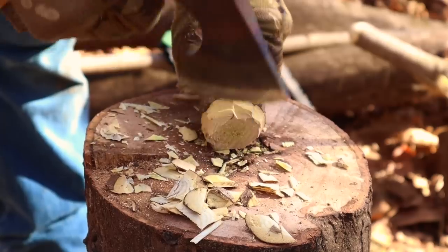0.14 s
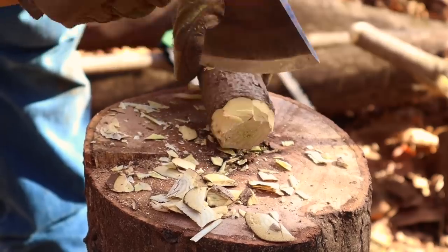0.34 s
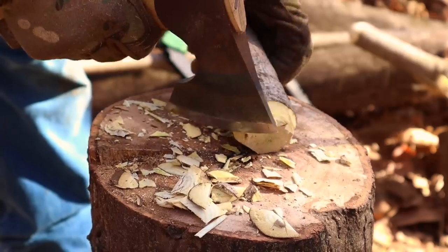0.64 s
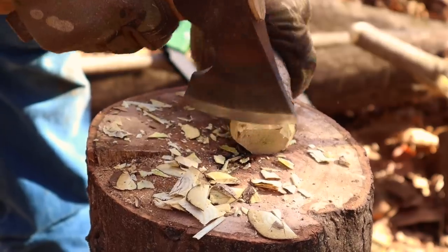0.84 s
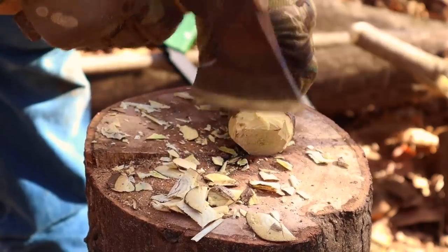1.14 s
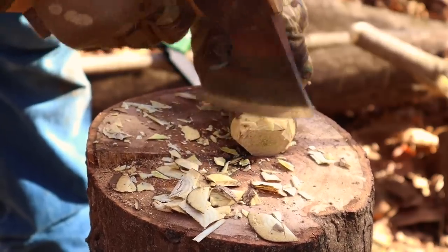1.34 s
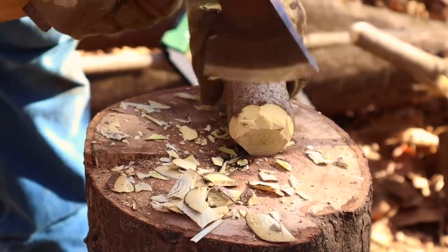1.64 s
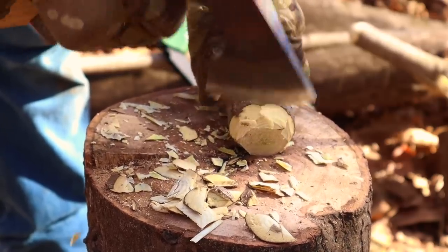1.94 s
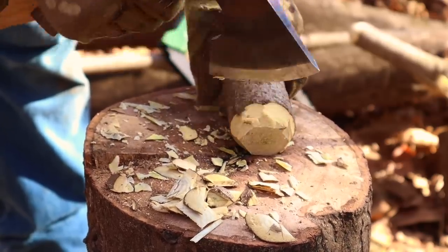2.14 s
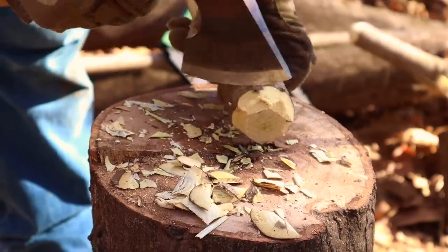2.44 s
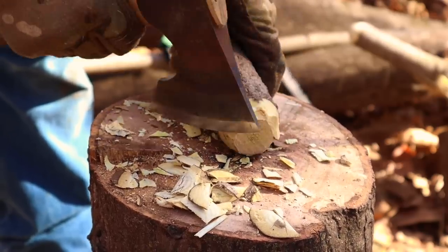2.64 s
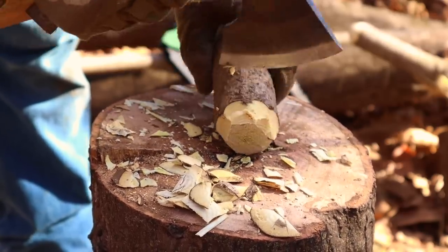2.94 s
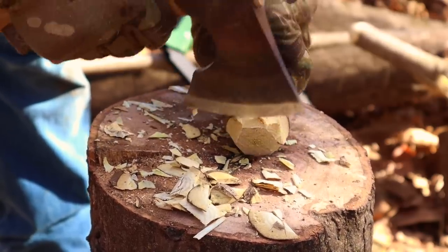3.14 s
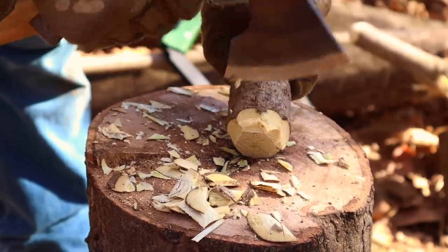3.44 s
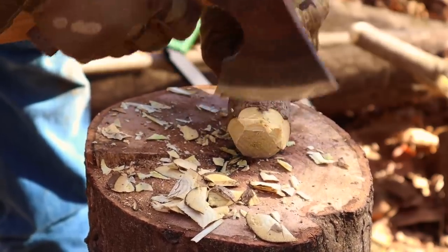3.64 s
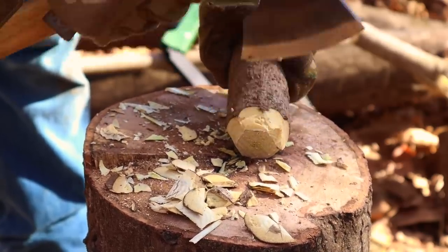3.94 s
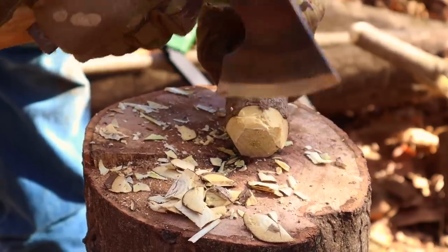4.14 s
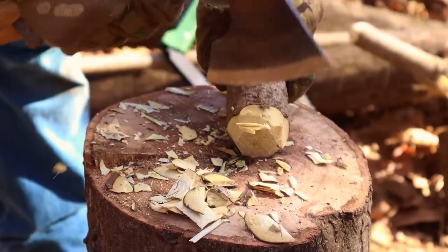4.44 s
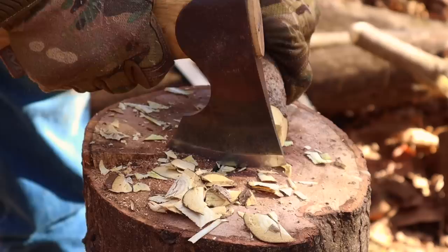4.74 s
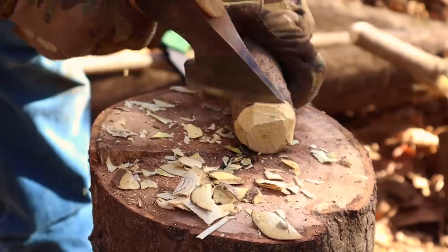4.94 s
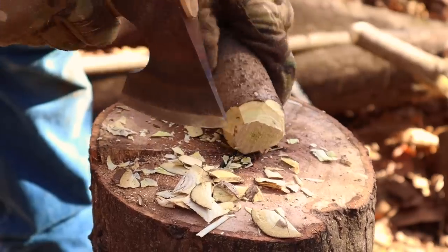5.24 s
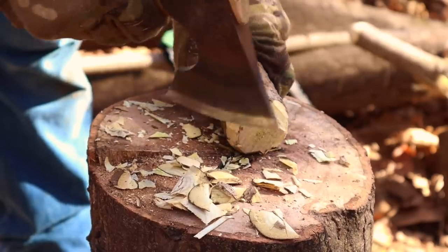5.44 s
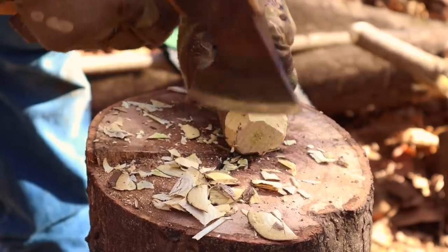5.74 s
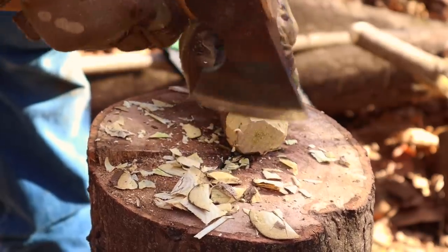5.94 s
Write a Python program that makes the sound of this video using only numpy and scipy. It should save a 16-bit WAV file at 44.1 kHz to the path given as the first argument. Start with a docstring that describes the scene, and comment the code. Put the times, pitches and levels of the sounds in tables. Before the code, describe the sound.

A hatchet chops a small green stick on a stump in three quick runs of crisp woody cracks, outdoors in quiet woods, heard close.

```python
"""Quiet woods, where a hatchet sharpens a green stick on a stump close by.
Each chop is two contacts (bite and snap) and a crackle of torn fibres, filtered by the stick's resonances.
The steel rings as fading sine waves; landings on the stump are duller blows; pulling free makes singing ticks.
Chips tick down, glove, sleeve and bark rub as shaped noise, and the grip squeaks once.
The trees answer faintly through an echo pattern, over soft air noise and a thin high whine."""
import sys
import numpy as np
from scipy import signal
from scipy.fft import rfft, irfft, next_fast_len
from scipy.io import wavfile
from scipy.ndimage import map_coordinates

SR = 44100
rng = np.random.default_rng(int(sys.argv[2]) if len(sys.argv) > 2 else 0)


def master(y):
    """Save y as 16-bit WAV."""
    cut = np.clip(np.atleast_2d(y).T, -1, 1)
    pcm = np.round(cut * 32767)  # scale
    wavfile.write(sys.argv[1], SR, pcm.astype(np.int16))


N = 268128  # length of the scene in samples
T = np.arange(SR // 4) / SR  # clock of one short sound, in seconds
TOP_HZ = 15800  # upper limit of the sound

# chops: t/s, level/dB, bite-to-snap/s, tearing/s, first stick mode f/Hz, second mode f/Hz,
# second mode gain/dB, boom/dB, knock/dB, brightness/dB
CHOPS = [ (0.0008, -24.5, .004, .009, 880, 2450, 4, -4, 0, 3.5),
         (0.2316, -28.5, .0028, .008, 1140, 3300, -4, -3, 1, 1),
         (1.0964, -32.3, .0014, .004, 830, 2700, 3, 7, 8, 1.5),
         (1.3384, -27.3, .0022, .005, 1080, 2860, 10, -2, -7, -3),
         (1.5594, -27.7, .0031, .010, 1340, 2860, 6, 0, -4, 0),
         (1.7961, -26.3, .0008, .008, 1000, 2600, -1, -3, -2, -3),
         (2.0344, -27.8, .0008, .009, 880, 2900, 3, -7, -1, .5),
         (2.2672, -31.5, .002, .006, 920, 3050, 2, 6, 3, 7),
         (3.3986, -24.5, .0041, .007, 980, 3020, 4, -1, -3, -2),
         (3.6209, -24.5, .0021, .006, 1720, 3200, -1, 10, 3, .5),
         (3.8577, -16.8, .0013, .005, 1170, 3100, 7, 4, -8, 0),
         (4.0984, -19.8, .0044, .006, 1180, 2850, -1, -1.5, -1, -2),
         (4.3748, -11.2, .0028, .005, 1480, 2700, 0, -7, -2, -1.5),
         (4.7201, -16.8, .0029, .007, 1100, 2950, 8, -1, -9, -1.5),
         (5.0745, -38.8, .0045, .01, 1190, 3100, 1, 4, 2.5, 5),
         (5.6964, -35.3, .0009, .004, 700, 2720, 6, 5, 8, -7),
         (5.9268, -32.3, .005, .012, 900, 2850, 6, -5, 1, 2)]
# blade or stick landing on the stump: t/s, level/dB, time to take the weight/s, boom/dB, knock/dB, brightness/dB
LANDINGS = [ (0.027, -32.9, .002, -2, -3.5, -8), (1.1162, -32.5, .0035, 4, -4.5, -2),
            (1.5905, -44.5, .0035, 5, 0, 1.5), (1.8182, -32.5, .005, 2, -5.5, 1.5),
            (2.0578, -32.2, .003, -3, -5.5, 0), (2.606, -56, .001, 3.5, 5, 3),
            (4.7358, -21.5, .0015, -5, 6.5, 2), (5.088, -52, .015, -2, 0, 6),
            (5.233, -55.5, .002, -1, -2, 4), (5.7195, -38, .0022, 8, 8, 5)]
# the blade pulled free of the cut: t/s, level of the tick/dB
PULLS = [(2.362, -53), (3.456, -58), (3.931, -58.5), (4.181, -61), (4.451, -60)]
# larger chips ticking down: t/s, level/dB, brightness/dB (tick() adds 2 dB to it)
CHIPS = [(2.328, -50.5, -2), (4.7893, -43, -9), (4.922, -57, -13), (5.111, -54, -12), (5.18, -59, -12.5),
         (5.221, -50, -15), (5.238, -54, -21)]
# rubs of glove, sleeve and bark as the stick is turned: t of reaching full level/s, length/s, level/dB
RUBS = [(0.485, .03, -55), (0.558, .025, -59.5), (0.745, .09, -62.5), (0.868, .05, -64.5),
        (2.375, .13, -65.5), (2.442, .015, -57.5), (2.622, .11, -65), (2.767, .02, -56.5), (4.9, .16, -67),
        (5.085, .015, -52), (5.11, .05, -59), (5.225, .11, -58.5), (5.385, .04, -66), (5.62, .07, -70)]
# one tiny squeak of the grip: t/s, f/Hz, level/dB
SQUEAK = (0.686, 3200, -59)

# colour of the struck stick: f/Hz, level/dB
STICK_COLOUR = [(40, -38), (150, -35), (265, -9), (410, -12.5), (620, -2.5), (950, 0), (1250, 0),
                (1750, -4), (2200, -5.5), (3300, -5.5), (4700, -21.5), (5500, -18.5), (7400, -6.5),
                (9500, -21.5), (13000, -20.5), (15800, -28)]
# colour of the stump's broad knock: f/Hz, level/dB
STUMP_COLOUR = [(40, -38), (130, -19), (250, 3), (400, -4), (600, 2), (1100, 1), (1900, -11), (2900, -4),
                (4500, -17), (8000, -22), (16000, -34)]
# ringing modes of the stump: f/Hz, level/dB, time to fall 60 dB/s
STUMP_MODES = [(240, -1.5, .026), (305, -5, .027), (560, -4, .026), (1034, -2, .036)]
# ringing modes of the steel head: f/Hz, level/dB, time to fall 60 dB/s
BLADE_MODES = [(1179, -7, .033), (2778, -1, .026), (4716, -26, .026), (6945, -5, .048), (7040, -11, .04),
               (8210, -19, .024), (13300, -23, .036)]
# the grip of the wood damps the steel's lower modes most: f/Hz, level/dB
HELD_COLOUR = [(7000, -9), (13000, 0)]
# where a blow's colour is set, from boom through knock, middle and crack to brightness: f/Hz
TONE_HZ = [250, 620, 1300, 2900, 7000]
# colour of a falling chip: f/Hz, level/dB
CHIP_COLOUR = [(200, -20), (700, -6), (1500, -1), (4200, 0), (9000, 0), (16000, -10)]
# colour of rubbing: f/Hz, level/dB
RUB_COLOUR = [(200, -20), (700, -11), (1800, -1.5), (2900, 0), (4600, -9), (9000, -15), (16000, -28)]
# colour of the trees' far answer: f/Hz, level/dB
TREES_COLOUR = [(100, -15), (500, -7), (1000, -1), (1700, -.5), (3000, -4), (6000, -14.5), (16000, -21)]
# colour of the still air: f/Hz, level/dB
AIR_COLOUR = [(15, -40), (25, -7.5), (44, -8), (70, -3), (114, -3), (277, -5), (575, -3), (863, -6.5),
              (1130, -6.5), (1700, -8.5), (2410, -7.5), (6050, -14), (6920, -12.5), (16000, -21)]
# thin steady whine: f/Hz, rms level/dB
WHINE = [(6697, -83), (13388, -95)]

# the sooner the chip gives, the harder it snaps: snap over bite with no wait (dB), fall with the wait (dB per s)
SNAP_DB, SNAP_FALL_DB_PER_S = 14, 3000
# longer tearing is also stronger: its level at zero length (dB), growth with length (dB per s)
TEAR_DB, TEAR_GROWTH_DB_PER_S = -10.5, 1300
# the stick's modes: gain of the first over the direct blow (dB), sharpness Q of both
FIRST_MODE_DB, FIRST_Q, SECOND_Q = 1, 6, 8
# a landing sooner than this after a chop means the blade sliced clean through
THROUGH_S = .05
# ring of the steel: after slicing through (dB relative to the chop), held in the wood (dB, whatever the chop)
FREE_RING_DB, HELD_RING_DB = -.5, -40
# share of a blow's brightness that also reaches its crack, near 3 kHz
CRACK_SHARE = .4
# the pull's tick: brightness before tick() adds 2 dB (dB), singing steel relative to the tick (dB)
PULL_BRIGHT_DB, PULL_RING_DB = -6, -4.5
# crumbs: chance per chop, shortest and longest flight (s), level (dB), brightness before tick() adds 2 dB (dB)
CRUMB_CHANCE, CRUMB_SOON_S, CRUMB_LATE_S, CRUMB_DB, CRUMB_BRIGHT_DB = .35, .04, .13, -64, -12
# each rub: rise, time to fall 60 dB (s); the fainter sleeve after it: relative level (dB), time to fall 60 dB (s)
RUB_RISE_S, RUB_RELEASE_S, SLEEVE_DB, SLEEVE_T60_S = .015, .07, -14, .8


def chops():
    """The edge bites, fibres tear and a chip snaps off; the cut drives the steel and the blow shakes the ground."""
    out = np.zeros(N)
    for s, db, gap, tear, first_hz, second_hz, second_db, *shade in CHOPS:
        snap_db = SNAP_DB - SNAP_FALL_DB_PER_S * gap
        tear_db = TEAR_DB + TEAR_GROWTH_DB_PER_S * tear
        contacts = push(0, width=.00002) + amp(snap_db) * push(gap, width=.000012)
        tearing = crackle(fade(t60=.016, hold=.85 * tear), spread=.6)
        force = contacts / np.hypot(1, amp(snap_db)) + amp(tear_db) * tearing
        # the stick's modes shift with the grip and with where the edge lands
        first_mode = amp(FIRST_MODE_DB) * resonate(force, first_hz, FIRST_Q)
        second_mode = amp(second_db) * resonate(force, second_hz, SECOND_Q)
        wood = force + first_mode + second_mode
        add(out, s, amp(db) * burst(colour(wood, STICK_COLOUR, tone(*shade))))

        # the steel starts to die away faster at the next landing
        free = min([row[0] - s for row in LANDINGS if row[0] > s], default=1)
        steel = ring(BLADE_MODES, hold=.6 * tear, attack=.001, scatter_db=1)
        steel = steel * fade(t60=.05, hold=free)
        if free < THROUGH_S:
            steel_ring = amp(db + FREE_RING_DB) * steel
        else:
            steel_ring = amp(HELD_RING_DB) * colour(steel, HELD_COLOUR)
        add(out, s + gap / 2, steel_ring)

        stump = ring(STUMP_MODES, hold=0, attack=.002, scatter_db=2.5)
        add(out, s + gap, amp(db - 27) * burst(stump))
        ground = ring([(66, 0, .35), (95, -9, .16)], hold=0, attack=.012, scatter_db=0.5)
        add(out, s, amp(.4 * db - 54.5) * ground)  # harder chops shake it only a little more
    return out


def landings():
    """A duller blow into the heavy stump: chips crush first, then the block takes the weight."""
    out = np.zeros(N)
    for s, db, seat, *shade in LANDINGS:
        crushing = crackle(fade(t60=.02, hold=1.3 * seat), spread=.5)
        force = 1.5 * push(seat, width=.00016) + crushing
        knock = burst(colour(force, STUMP_COLOUR))
        stump = ring(STUMP_MODES, hold=0, attack=.001, scatter_db=1.0)
        add(knock, seat, amp(-5) * burst(stump))
        add(out, s, amp(db) * burst(colour(knock, tone(*shade))))
    return out


def pulls():
    """The edge leaves the cut with a tick that sets its high mode singing."""
    out = np.zeros(N)
    for s, db in PULLS:
        singing = ring([(6990, 0, .16)], hold=0, attack=.001, scatter_db=0)
        add(out, s, amp(db) * (tick(PULL_BRIGHT_DB) + amp(PULL_RING_DB) * singing))
    return out


def chips():
    """Chips tick down on the stump as short crackles; now and then a crumb follows a chop."""
    out = np.zeros(N)
    for s, db, bright_db in CHIPS:
        add(out, s, amp(db) * tick(bright_db))
    for (s, *_), (luck, flight) in zip(CHOPS, rng.random((len(CHOPS), 2))):
        fall = CRUMB_SOON_S + flight * (CRUMB_LATE_S - CRUMB_SOON_S)
        crumb = amp(CRUMB_DB) * tick(CRUMB_BRIGHT_DB)
        add(out, s + fall, (luck < CRUMB_CHANCE) * crumb)
    return out


def handling():
    """Cloth and bark rub in uneven strokes, catching and slipping; once the grip squeaks."""
    t = np.arange(N) / SR
    effort = np.sqrt(sum((amp(db) * stroke(t - s, length)) ** 2 for s, length, db in RUBS))
    catches = amp(1.2 * wobble(60) + 2.5 * wobble(500))
    friction = catches * crackle(np.ones(N), spread=.9)
    rub = effort * unit(colour(friction, RUB_COLOUR))
    s, hz, db = SQUEAK
    swell = np.exp(-((t - s) / .006) ** 2)
    squeak = swell * np.sin(2 * np.pi * np.cumsum(hz + 90 * wobble(400)) / SR)
    return rub + amp(db) * squeak


def trees(x):
    """The log pile scatters a short bright answer, the woods a thin dull tail, and one trunk throws back an echo."""
    logs = crackle(fade(t60=.09) * (1 - np.exp(-T / .01)), spread=.3)
    tail = crackle(fade(t60=.42) * (1 - np.exp(-T / .006)), spread=.45)
    trunk = amp(-38) * click(.0543)
    near = colour(amp(-32.8) * logs, [(100, -8), (1200, 0), (3000, -3), (7000, -2), (16000, 0)])
    far = colour(amp(-36) * tail + trunk, TREES_COLOUR)
    return signal.fftconvolve(x, near + far)[:N]


def background():
    """Still forest air is gently wavering noise; the whine is sine waves whose pitch trembles slightly."""
    air = amp(-66.5 + .5 * wobble(3)) * unit(colour(rng.standard_normal(N), AIR_COLOUR))
    whine = np.zeros(N)
    for hz, db in WHINE:
        phase = 2 * np.pi * np.cumsum(hz + 22 * wobble(120)) / SR
        whine += amp(db) * np.sqrt(2) * np.sin(phase)  # root 2 turns rms into peak
    return air + whine


def push(s, width):
    """A contact s seconds into a sound, softened over width seconds by yielding wood."""
    since = np.maximum(T - s, 0)
    pulse = since * np.exp(-since / width)
    return pulse / (pulse.sum() + 1e-20)


def crackle(envelope, spread):
    """Fibres breaking: noise whose grains vary widely in size (log-normal), total energy 1."""
    size = np.exp(spread * np.clip(rng.standard_normal(len(envelope)), -2, 2))
    x = envelope * size * rng.standard_normal(len(envelope))
    return x / np.linalg.norm(x)


def resonate(x, hz, q):
    """A damped resonance of gain 1 at its centre; a higher q rings longer."""
    return signal.lfilter(*signal.iirpeak(hz, q, SR), x)


def ring(modes, hold, attack, scatter_db):
    """Damped modes, each sounded at a slightly random strength and a random phase."""
    waves = np.zeros(len(T))
    for hz, db, t60 in modes:
        strength = amp(db + rng.normal(0, scatter_db))
        waves += strength * fade(t60, hold) * np.sin(2 * np.pi * (hz * T + rng.random()))
    return waves * (1 - np.exp(-T / attack))


def tick(bright_db):
    """A light dry tick of wood: a very short crackle, its treble set by bright_db plus 2 dB."""
    grains = crackle(fade(t60=.012, hold=.002), spread=.8)
    return burst(colour(grains, CHIP_COLOUR, [(2500, 0), (7000, bright_db + 2)]))


def stroke(t, length):
    """Level of one rub: rise until t = 0, hold for length, then release into a faint stir of the sleeve."""
    rise = np.clip(1 + t / RUB_RISE_S, 0, 1)
    after = np.maximum(t - length, 0)
    release = amp(-60 * after / RUB_RELEASE_S)
    sleeve = amp(SLEEVE_DB - 60 * after / SLEEVE_T60_S)
    return rise * np.maximum(release, sleeve)


def tone(boom_db, knock_db, bright_db):
    """A blow's own colour, relative to the middle of the wood's range."""
    return list(zip(TONE_HZ, [boom_db, knock_db, 0, CRACK_SHARE * bright_db, bright_db]))


def colour(x, *spectra):
    """Filter without pre-echo (minimum phase) whose gain in dB is the sum of the (Hz, dB) spectra."""
    size = 2 * next_fast_len(len(x))
    log_hz = np.log(np.fft.rfftfreq(size, 1 / SR) + 1)
    db = sum(np.interp(log_hz, np.log([p[0] for p in s]), [p[1] for p in s]) for s in spectra)
    # folding the cepstrum (spectrum of the log gain) puts the response after time zero
    cepstrum = irfft(np.log(amp(db)))[:size // 2]
    cepstrum[1:] *= 2
    return irfft(rfft(x, size) * np.exp(rfft(cepstrum, size)))[:len(x)]


def fade(t60, hold=0):
    """Full level for hold seconds, then a fall of 60 dB every t60 seconds."""
    return amp(-60 * np.maximum(T - hold, 0) / t60)


def click(s):
    """A single-sample impulse s seconds into a sound."""
    return signal.unit_impulse(len(T), max(0, round(s * SR)))


def wobble(rate):
    """A smooth random curve through rate random points a second."""
    points = rng.standard_normal(int(N * rate / SR) + 4)
    return map_coordinates(points, [np.arange(N) * rate / SR])


def amp(db):
    """Decibels to gain."""
    return 10 ** (np.asarray(db) / 20)


def unit(x):
    """Scale to rms 1."""
    return x / np.sqrt(np.mean(x ** 2) + 1e-20)


def burst(x):
    """Scale a short sound to the energy of 10 ms at rms 1."""
    return x * np.sqrt(SR / 100 / (np.sum(x ** 2) + 1e-20))


def add(track, s, sound):
    """Mix a sound into the track at time s in seconds."""
    start = max(0, round(s * SR))
    track[start:start + len(sound)] += sound[:max(0, len(track) - start)]


def scene():
    """All the work, the trees' answer to it and the background, alike in both channels."""
    work = chops() + landings() + pulls() + chips() + handling()
    return np.tile(work + trees(work) + background(), (2, 1))


def record(dry):
    """Peaks beyond full scale are flattened; a steep low-pass filter then removes the top treble."""
    clipped = np.clip(dry, -1, 1)
    low_pass = signal.cheby1(16, .1, TOP_HZ, fs=SR, output="sos")
    return signal.sosfilt(low_pass, clipped)


dry = scene()
out = record(dry)
master(out)
```